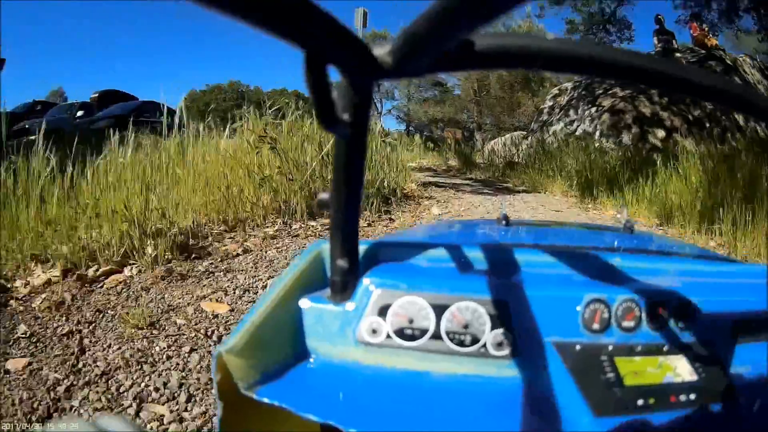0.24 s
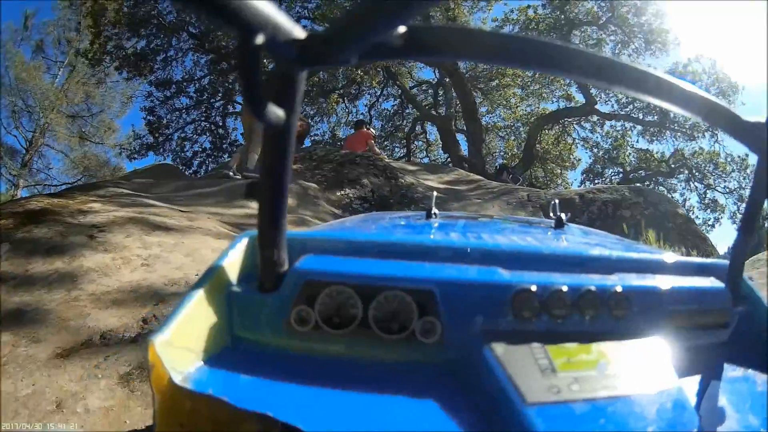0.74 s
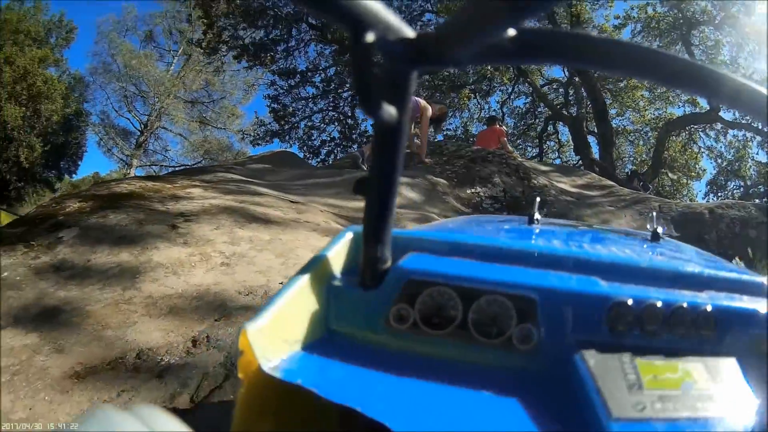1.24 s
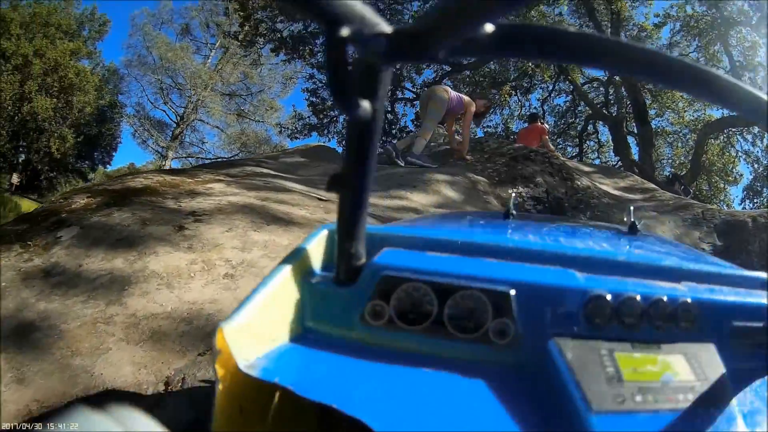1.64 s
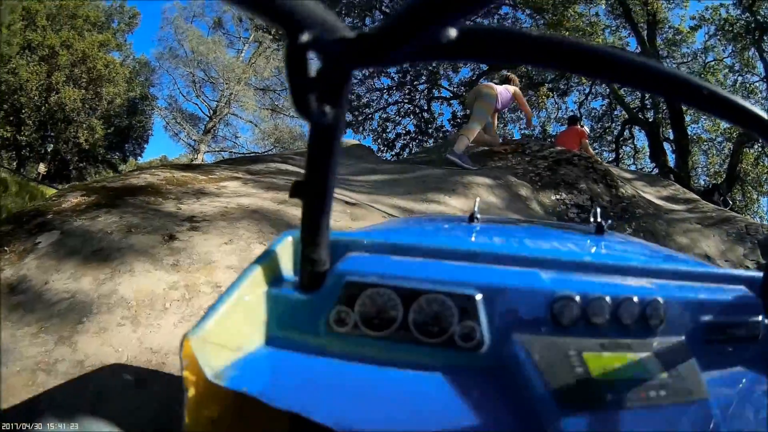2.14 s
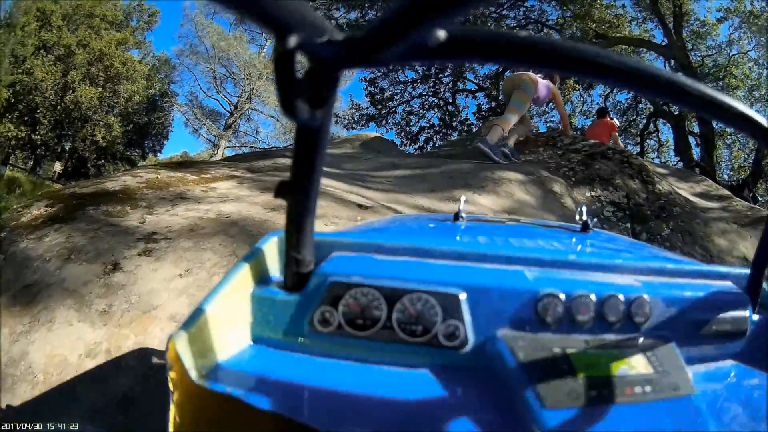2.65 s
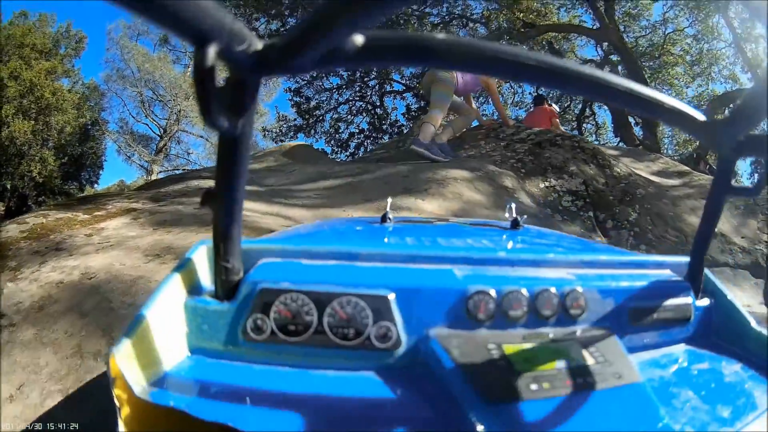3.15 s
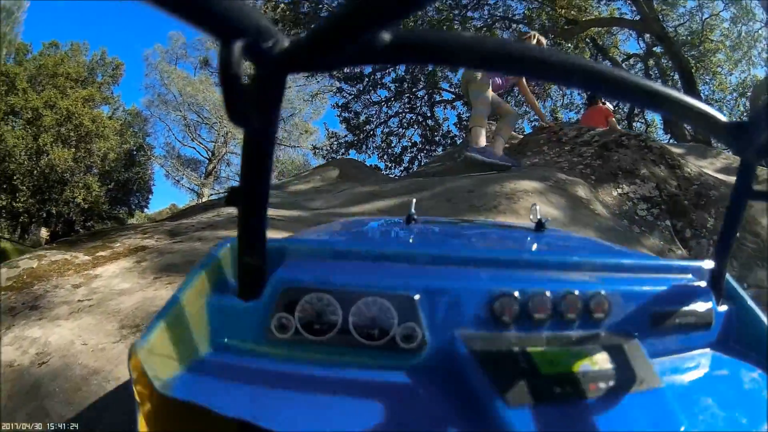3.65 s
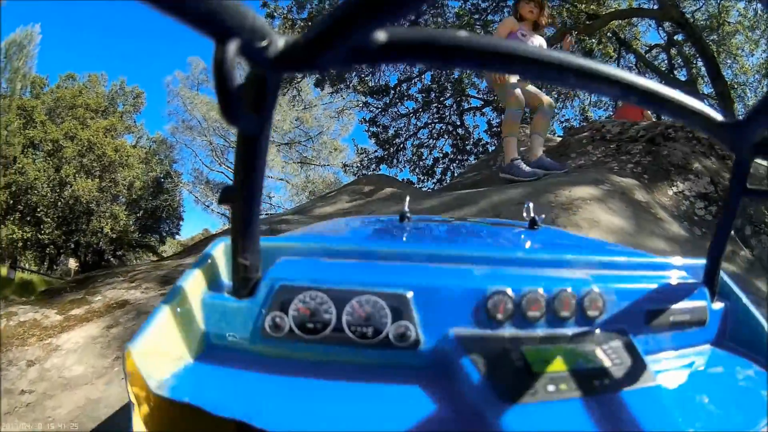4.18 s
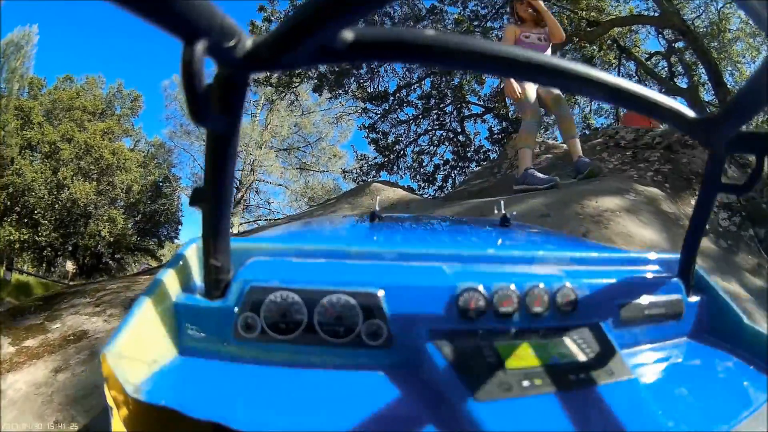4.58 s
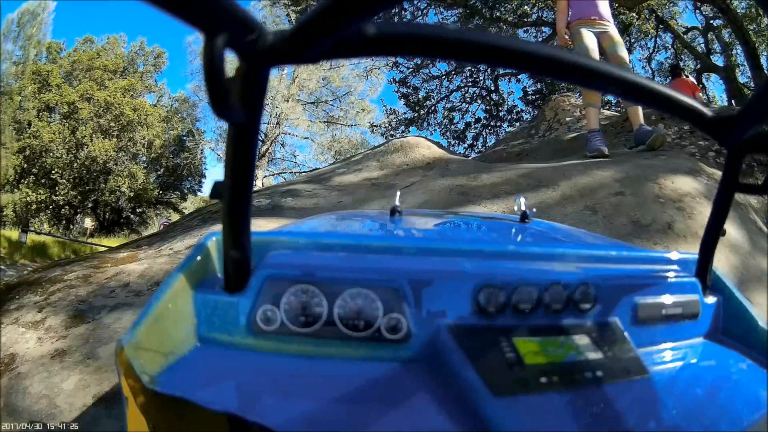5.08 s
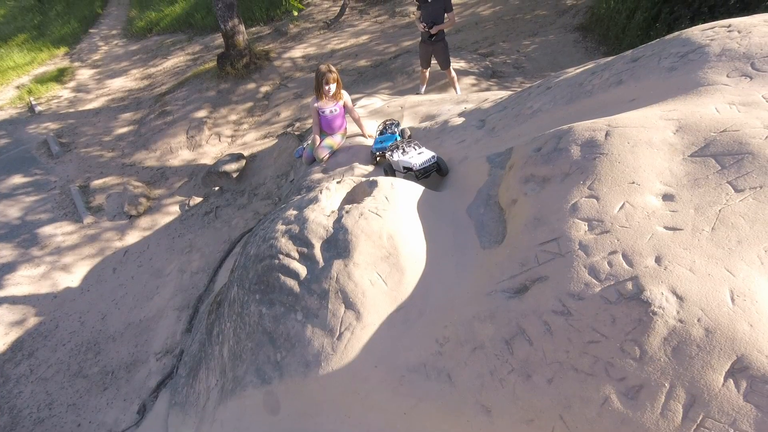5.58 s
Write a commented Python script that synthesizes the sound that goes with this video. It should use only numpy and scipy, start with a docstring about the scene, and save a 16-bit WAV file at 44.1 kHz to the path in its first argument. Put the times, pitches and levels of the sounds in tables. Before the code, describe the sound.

A radio-controlled car rushes briefly over crunching gravel with a rasping motor, heard from on its plastic body. It switches abruptly to climbing a rock: the gears whine in a warbling pitch that rises and quickens, over rattling, low bumps, a thin steady electronic whistle and small squeaks. Near the end a sudden cut leaves the whine faint and far away in quiet open air.

```python
"""The gears of a radio-controlled crawler whine through its plastic shell, heard from on its body.
It races over gravel, then climbs a rock; last, after an abrupt cut, it crawls far off.
The drive shafts modulate the gear pitch, and the swing quickens as the speed rises. The speed
controller sings on a steady note, stones snap from under the tyres and dry joints squeak."""
import sys
import numpy as np
from scipy import signal
from scipy.fft import rfft, irfft, next_fast_len
from scipy.io import wavfile
from scipy.ndimage import uniform_filter1d, minimum_filter1d, map_coordinates

SR = 44100
rng = np.random.default_rng(int(sys.argv[2]) if len(sys.argv) > 2 else 0)


def materialize(psi):
    """Save the field psi as 16-bit PCM at rate SR to the path in sys.argv[1].

    A 1-D psi becomes a single channel; in a 2-D psi each row is a channel.
    """
    bounded = np.clip(np.atleast_2d(psi).T, -1, 1)
    quanta = np.round(bounded * 32767).astype(np.int16)
    wavfile.write(sys.argv[1], SR, quanta)


N = 256657

CLIMB_AT_S, FAR_AT_S = 0.418, 5.151
CRUISE_HZ, CRAWL_HZ = 800, 550  # tooth-mesh rates: reference for the climb, mean of the far crawl
SWITCHING_HZ = 979.3
COMMUTATOR_PER_TOOTH = 0.15  # commutator pulses per tooth mesh

# Modes of the plastic shell. Each row: centre in Hz, width in Hz, gain in dB.
SHELL_MODES = [(453, 146, -3.5), (579, 142, -6.5), (853, 180, -1), (1109, 132, 4.5), (1312, 69, -0.5),
               (1607, 316, -3.5), (1937, 190, 1.5), (2425, 710, -8), (2855, 114, -3.5), (3288, 474, 0),
               (4420, 90, -7)]
# Drags of a dry joint. Each row: centre in seconds, half length in seconds, top pitch in Hz, level in dB.
JOINT_DRAGS = [(0.906, 0.036, 2130, -39.5), (4.728, 0.024, 1462, -44.5)]


def amp(db):
    """Amplitude ratio of a level in decibels."""
    return 10 ** (np.asarray(db) / 20)


def unit(x):
    """Normalisation to rms 1."""
    return x / np.sqrt(np.mean(x ** 2) + 1e-20)


def clock():
    """Time of every sample in seconds."""
    return np.arange(N) / SR


def curves(rows):
    """Linear interpolation in time: one curve for each column after the first."""
    times, *columns = np.transpose(rows)
    return [np.interp(clock(), times, column) for column in columns]


def colour(points, hz):
    """Spectral envelope through (Hz, dB) points on a logarithmic frequency axis."""
    point_hz, db = np.transpose(points)
    return amp(np.interp(np.log(hz + 1), np.log(point_hz + 1), db))


def resonances(modes, hz):
    """Summed Lorentzian peaks, each given by centre in Hz, width in Hz and gain in dB."""
    return sum(amp(db) / (1 + (2 * (hz - centre) / width) ** 2) for centre, width, db in modes)


def filtered(x, response):
    """Linear filtering: the spectrum of x times a frequency response."""
    size = next_fast_len(N + SR // 4)
    return irfft(rfft(x, size) * response(np.fft.rfftfreq(size, 1 / SR)), size)[:N]


def wobble(rate):
    """Smooth random modulation with `rate` knots a second."""
    return map_coordinates(rng.standard_normal(int(N * rate / SR) + 4), [clock() * rate])


def noise(response, force=1):
    """Source and filter: white noise, modulated by a force, then coloured and scaled to rms 1."""
    return unit(filtered(force * rng.standard_normal(N), response))


def turning(hz):
    """Phase in radians as the integral of frequency."""
    return 2 * np.pi * np.cumsum(hz) / SR


def swells(rows):
    """Summed Gaussian envelopes, each given by centre and half length in seconds and level in dB."""
    return sum(amp(db) * np.exp(-((clock() - s) / half) ** 2) for s, half, db in rows)


def chirp(centre_s, length_s, pitch_hz, rise, sag, tremble_hz):
    """Frequency modulation of one short slip; rise and mid-way sag are shares of the pitch."""
    position = np.clip(2 * (clock() - centre_s) / length_s, -1, 1)
    hz = pitch_hz * (1 + rise * position / 2 + sag * position ** 2) + tremble_hz * wobble(1500)
    return np.cos(np.pi * position / 2) * np.sin(turning(hz))


def gravel():
    """Random impacts: grit under the tyres merges into noise, and single stones add a bright crunch."""
    # Spectrum of the grit. Each row: frequency in Hz, relative density in dB.
    grit_spectrum = [(12, -29), (20, 2), (70, 2), (140, -3), (416, 2), (834, -7), (958, 0.5), (1540, -6.5),
                     (1870, -0.5), (2400, -7.5), (3000, -0.5), (4070, -19.5), (8880, -12.5), (12400, -24),
                     (15500, -39)]
    grit = noise(lambda hz: colour(grit_spectrum, hz), amp(2.7 * wobble(700)))
    impacts_per_s, decay_s = 220, 0.00082
    impacts = (rng.random(N) < impacts_per_s / SR) * rng.exponential(size=N)
    bursts = signal.lfilter([1], [1, -np.exp(-1 / (decay_s * SR))], impacts)
    crunch = noise(lambda hz: resonances([(8840, 3400, 0)], hz), bursts)
    return amp(-26.5) * grit + amp(-47) * crunch


def racing_gears():
    """Shell resonance at full speed: the gears blur into a rasp around the second mesh harmonic."""
    # Modes of the shell at full speed. Each row: centre in Hz, width in Hz, gain in dB.
    racing_modes = [(1180, 190, 1.5), (1424, 170, 2), (1890, 250, 2.5), (3060, 130, -1), (3310, 380, -1)]
    # Speed over the gravel. Each row: time in seconds, tooth-mesh rate in Hz.
    race_speed = [(0, 1628), (.17, 1468), (.24, 1690), (.345, 1463), (.42, 1570)]
    mesh_hz, = curves(race_speed)
    rasp = noise(lambda hz: resonances(racing_modes, hz), amp(3.5 * wobble(300)))
    squeal = unit(amp(3 * wobble(50)) * np.sin(2 * turning(mesh_hz) + 0.3 * wobble(200)))
    return amp(-29) * rasp + amp(-34) * squeal


def controller(whistle_db):
    """Forced vibration: the windings sing at harmonics of the switching rate; the sixth whistles."""
    # Partials of the hum. Each row: multiple of the switching rate, relative level in dB.
    harmonics = [(1, -36), (2, -47.5), (3, -52), (5, -87), (8, -63)]
    phase = 2 * np.pi * SWITCHING_HZ * clock()
    hum = sum(amp(db + 0.86 * wobble(35)) * np.sin(k * phase) for k, db in harmonics)
    whistle = amp(whistle_db) * np.sin(6 * phase)
    return np.sqrt(2) * (hum + whistle)


def stone_snaps():
    """Sliding friction: stones snap from under a tyre in rough, falling scrapes."""
    # Scrapes. Each row: centre in seconds, length in seconds, pitch in Hz, relative level in dB.
    snaps = [(.018, 0.0069, 8800, -17.5), (0.085, .012, 11800, -22), (0.092, 0.016, 8140, -21.5),
             (0.236, 0.0072, 8800, -20), (0.311, 0.013, 10800, -25.5), (0.314, .012, 7700, -25),
             (.382, 0.0062, 8570, -23), (2.254, 0.0036, 7800, -29.5), (4.759, 0.0021, 5287, -30)]
    return sum(amp(db) * chirp(s, length, hz, rise=-0.16, sag=0, tremble_hz=730)
               for s, length, hz, db in snaps)


def joint_squeaks():
    """Stick-slip friction: dry joints slip in short, trembling chirps."""
    # Slips. Each row: centre and length in seconds, pitch in Hz, rise as its share, relative level in dB.
    slips = [(.138, 0.014, 8650, 0.098, -15.5), (.873, .012, 7230, 0.098, -29.5),
             (1.091, .01, 10600, .14, -36), (2.138, .028, 8710, 0.15, -33),
             (2.435, 0.0091, 10200, 0.17, -33), (2.712, 0.025, 14010, 0, -33), (2.955, 0.021, 8350, 0, -29),
             (3.178, .011, 8450, .11, -18.5), (3.203, .0073, 9250, 0.0056, -30),
             (3.327, .011, 9100, .07, -24), (4.026, .022, 13970, 0.0027, -30),
             (4.316, .02, 14250, 0.007, -28), (4.617, .02, 14140, 0, -26), (4.725, 0.019, 7150, 0.053, -37),
             (4.88, .022, 13590, 0, -32)]
    return sum(amp(db) * chirp(s, length, hz, rise, sag=0.055, tremble_hz=183)
               for s, length, hz, rise, db in slips)


def mesh_rate(mean_hz, start_s, start_turns):
    """Frequency modulation by the shaft's joints: the faster the motor, the faster the mesh rate swings."""
    teeth_per_swing, depth, skew = 113.45, 0.157, 0.11
    angle = turning(mean_hz * (clock() >= start_s)) / teeth_per_swing + 2 * np.pi * start_turns
    return mean_hz * (1 + depth * (np.cos(angle) + skew * np.sin(2 * angle)))


def gear_whine(phase, speed_db, rough_db, patchy_db, jitter_rad, runout_rad):
    """Forced resonance: mesh harmonics of uneven teeth sweep through the modes of the shell."""
    # Mesh tones. Each row: multiple of the mesh rate, relative level in dB, dB gained per dB of speed.
    harmonics = [(1, -25, -0.28), (2, -27, -0.21), (3, -36.5, -0.16), (4, -44, -0.5), (5, -40.5, 1.5),
                 (6, -44.5, 1.2)]
    # Transmission from gearbox mount to shell. Each row: frequency in Hz, gain in dB.
    mount = [(575, -2.5), (640, -5.5), (700, -3.5), (760, -8), (830, -0.5), (1080, -0.5), (1350, 0.5),
             (1450, 0), (1650, 0), (1950, 0.5), (3400, 2), (3900, -1.5), (6000, -11)]
    # the pinion runs off centre, and the motor's three poles pull in jerks
    poles = COMMUTATOR_PER_TOOTH * phase
    sway = runout_rad * (np.sin(poles / 3 + wobble(25)) + np.sin(poles + wobble(25)))
    tones = np.zeros(N)
    for k, db, slope in harmonics:
        uneven = unit(amp(rough_db * wobble(260) + patchy_db * wobble(45)))
        tones += amp(db + slope * speed_db) * uneven * np.sin(k * phase + sway + jitter_rad * wobble(200))
    return np.sqrt(2) * filtered(tones, lambda hz: resonances(SHELL_MODES, hz) * colour(mount, hz))


def tooth_rattle(phase):
    """Backlash: the teeth knock once a mesh with uneven force and excite the shell."""
    # Spectrum of the tooth force. Each row: frequency in Hz, relative density in dB.
    force_spectrum = [(250, 9), (500, -6.5), (700, 4), (870, 2.5), (1100, -0.5), (1400, 3), (1900, -1),
                      (2400, -2), (3200, -12), (4500, -13), (7000, -16)]
    knocks = (1 + 0.5 * np.cos(phase)) * amp(2.3 * wobble(450))
    return noise(lambda hz: colour(force_spectrum, hz) * resonances(SHELL_MODES, hz), knocks)


def shaft_tones(phase, speed_db):
    """Rotational orders: slower shafts and gears hum below the mesh rate, growing steeply with speed."""
    # Shaft orders. Each row: share of the mesh rate, level in dB at cruising speed.
    orders = [(.06, -58.5), (.24, -50.5), (.43, -56)]
    return sum(amp(db + 5.5 * speed_db + 0.81 * wobble(60)) * np.sin(share * phase + 1.1 * wobble(60))
               for share, db in orders)


def chassis_rumble(speed_db):
    """Structure-borne noise: a low rumble swells where the chassis bumps on the rock."""
    # Spectrum of the rumble. Each row: frequency in Hz, relative density in dB.
    spectrum = [(12, -47), (20, -58), (49, 11.5), (145, 4), (228, 4.5), (373, 10.5), (443, -2), (480, 5),
                (620, -26), (1060, -120)]
    # Bumps. Each row: centre in seconds, level in dB over the rumble.
    bumps = [(1.18, 5), (1.8, 1), (2.27, 7.5), (3.05, 5.5), (3.27, 3.5)]
    jolts = np.hypot(1, swells([(s, 0.035, db) for s, db in bumps]))
    return amp(-44.5 + 0.22 * speed_db + wobble(14)) * jolts * noise(lambda hz: colour(spectrum, hz))


def friction_hiss(brush_db):
    """Sliding friction: the hiss of the motor brushes and that of a dragging joint add in power."""
    # Spectrum of the hiss. Each row: frequency in Hz, relative density in dB.
    spectrum = [(2180, -77), (3700, -2), (4070, -15), (4460, -6.5), (5140, -10), (5560, -11), (5660, -5.5),
                (6080, -5), (6200, -5.5), (6660, -11), (8930, 3), (10400, -12), (12900, -13), (14700, -30),
                (15500, -38)]
    brushing = amp(brush_db + 0.71 * wobble(10))
    dragging = amp(-1) * swells([(s, half, db) for s, half, _, db in JOINT_DRAGS])
    return np.hypot(brushing, dragging) * noise(lambda hz: colour(spectrum, hz), amp(2.2 * wobble(600)))


def commutator_sidebands(phase):
    """Intermodulation: the commutator chops the switched current into sum and difference tones."""
    # Sidebands. Each row: switching multiple, commutator multiple, relative level in dB.
    sidebands = [(1, -1, -31.5), (1, 1, -41.5), (2, -1, -71), (2, -2, -44.5)]
    switching = 2 * np.pi * SWITCHING_HZ * clock()
    poles = COMMUTATOR_PER_TOOTH * phase
    return sum(amp(db + 2.5 + 1.2 * wobble(25.22)) * np.sin(k * switching + j * poles + 0.35 * wobble(60))
               for k, j, db in sidebands)


def joint_drags():
    """Stick-slip oscillation: a dragging joint buzzes in harmonics whose pitch arches up and back down."""
    arch, odd_db = 0.23, -3.5
    squeals = np.zeros(N)
    for s, half, top_hz, db in JOINT_DRAGS:
        phase = turning(top_hz * np.exp(-arch * ((clock() - s) / half) ** 2))
        buzz = sum(amp(3.2 * wobble(90) + odd_db * (k % 2)) * np.sin(k * (phase + 0.24 * wobble(600)))
                   for k in range(2, 7))
        squeals += swells([(s, half, db)]) * buzz
    return filtered(squeals, lambda hz: resonances([(8550, 6700, 0)], hz))


def climb():
    """Superposition of the drive's sounds on the rock, their levels following speed and load."""
    # Motor speed set by the throttle. Each row: time in seconds, mean tooth-mesh rate in Hz.
    throttle = [(0.418, 555.5), (0.68, 625.3), (1.101, 577), (1.164, 483), (1.222, 590), (1.612, 694.8),
                (1.854, 647.4), (2.224, 728.5), (2.507, 843), (2.727, 906.5), (2.84, 882), (3.226, 924.2),
                (3.545, 794.4), (3.975, 856.5), (4.355, 714.9), (4.81, 879.7), (5.06, 785.3),
                (5.151, 832.5)]
    # Load on the gears. Each row: time in seconds, gain of the whine in dB, gain of rattle and hiss in dB.
    load = [(.42, -1, 1.5), (.6, -1.5, -1), (.8, 0, -0.5), (1.05, -1.3, .8), (1.35, 0, 1.3), (1.65, 0.7, 0),
            (2.45, 1, 0.5), (2.9, -2, 0), (3.35, -1.5, -0.5), (3.8, 0, 1), (4.2, -0.6, -1), (4.75, -1, -1),
            (5.15, -0.2, -2.5)]
    # The controller's whistle. Each row: time in seconds, level in dB.
    whistle = [(.43, -42), (.63, -47.5), (.8, -42), (.93, -46.5), (1.17, -42), (1.33, -49.5), (2.95, -50.5),
               (3.05, -47), (3.22, -53), (3.45, -48), (4.05, -50), (5.14, -50.5)]
    throttle_hz, = curves(throttle)
    tone_db, load_db = curves(load)
    whistle_db, = curves(whistle)
    mesh_hz = mesh_rate(throttle_hz, CLIMB_AT_S, start_turns=0.429)
    phase = turning(mesh_hz * (1 + 0.00902 * wobble(150)))
    speed_db = 20 * np.log10(mesh_hz / CRUISE_HZ)
    surge_db = speed_db - uniform_filter1d(speed_db, size=SR // 6)  # speed over its local mean
    rattle = amp(-29 + load_db + 0.9 * speed_db + 0.31 * surge_db) * tooth_rattle(phase)
    shafts = shaft_tones(phase, speed_db)
    rumble = chassis_rumble(speed_db)
    hiss = friction_hiss(brush_db=-44.5 + load_db + 0.94 * speed_db + 0.5 * surge_db)
    whine = gear_whine(phase, speed_db, rough_db=3, patchy_db=2.5, jitter_rad=0.44, runout_rad=0.3)
    whine *= amp(tone_db + 0.6 * surge_db)
    motor = amp(0.66 * surge_db) * commutator_sidebands(phase) + controller(whistle_db)
    return whine + rattle + shafts + rumble + hiss + motor + joint_drags()


def open_air():
    """Ambient noise: a broad wash of air with narrow bands for a distant drone and a faint ring."""
    # Spectrum of the air. Each row: frequency in Hz, relative density in dB.
    spectrum = [(12, -52), (20, -13), (98, -21), (153, 1.5), (352, -12.5), (565, -11), (834, -16),
                (958, -12), (1670, -17.5), (1920, -16), (2270, -20.5), (4810, -30.5), (5850, -30),
                (6360, -25), (15500, -36)]
    air = noise(lambda hz: colour(spectrum, hz))
    drone = noise(lambda hz: resonances([(150, 77, 0)], hz) * (hz > 120))
    ring = noise(lambda hz: resonances([(919, 78, 0.027), (1940, 61, 1)], hz))
    return amp(-53) * air + amp(-60.5) * drone + amp(-63) * ring


def tyre_ticks():
    """Impact noise: the far tyres knock on the rock in brief, bright bursts."""
    # Knocks. Each row: centre in seconds, level at the crest in dB.
    knocks = [(5.352, -49.5), (5.76, -59)]
    envelope = sum(amp(db) * np.exp(-np.abs(clock() - s) / 0.0032) for s, db in knocks)
    return envelope * noise(lambda hz: resonances([(2800, 500, 3), (3800, 500, -10), (6050, 1800, -8)], hz))


def far_crawl():
    """Attenuation with distance: whine and controller are faint in the open air, and the bass is thin."""
    mesh_hz = mesh_rate(CRAWL_HZ, FAR_AT_S, start_turns=0.317)
    phase = turning(mesh_hz * (1 + 0.00581 * wobble(130)))
    whine = gear_whine(phase, speed_db=0, rough_db=2, patchy_db=1.5, jitter_rad=0.25, runout_rad=0.2)
    speed_db = 20 * np.log10(mesh_hz / CRAWL_HZ)
    whistle_db = -67.5 + 1.9 * speed_db + 4.9 * wobble(50)  # level at the listener
    distance_db = -28.5
    song = amp(distance_db) * controller(whistle_db - distance_db)
    far = amp(-33.5) * whine + song + open_air() + tyre_ticks()
    return filtered(far, lambda hz: colour([(35, 2), (60, -9), (105, -7), (135, 0)], hz))


def scene():
    """Run, climb and far crawl follow in hard cuts; a level difference sets the first two slightly right."""
    t = clock()
    climbing = climb()
    racing = gravel() + racing_gears() + amp(-2.5) * controller(whistle_db=-49)
    chirps = amp(-3) * (joint_squeaks() + stone_snaps())
    onboard = np.where(t < CLIMB_AT_S, racing, climbing) + chirps
    balance = amp([[-0.2], [0.2]])
    return np.where(t < FAR_AT_S, onboard * balance, far_crawl())


def record(dry):
    """Peak limiting holds down the loudest moments; a low-pass filter then limits the band."""
    ceiling, hold_s, top_hz = 0.26, 0.002, 15600
    hold = round(hold_s * SR)
    needed_gain = ceiling / np.maximum(np.abs(dry).max(axis=0), ceiling)
    gain = uniform_filter1d(minimum_filter1d(needed_gain, size=2 * hold), size=hold)
    return np.array([filtered(gain * side, lambda hz: hz < top_hz) for side in dry])


dry = scene()
out = record(dry)
materialize(out)
```